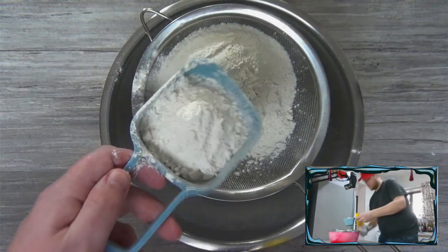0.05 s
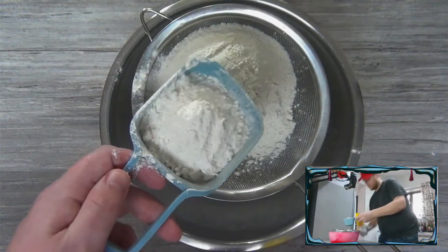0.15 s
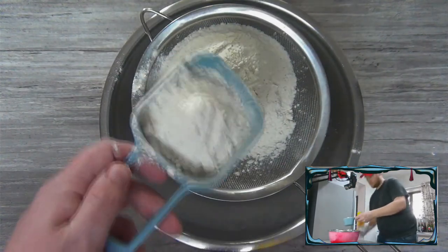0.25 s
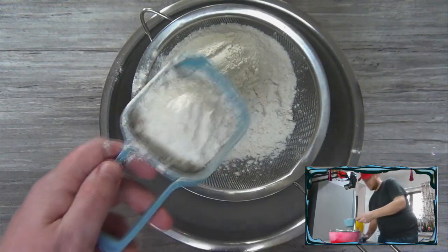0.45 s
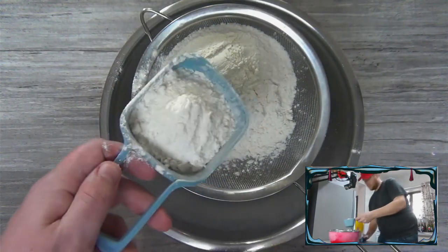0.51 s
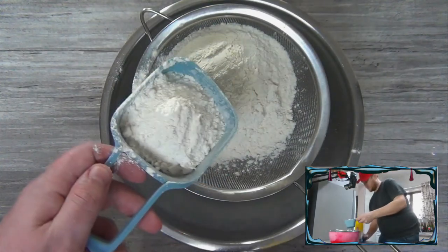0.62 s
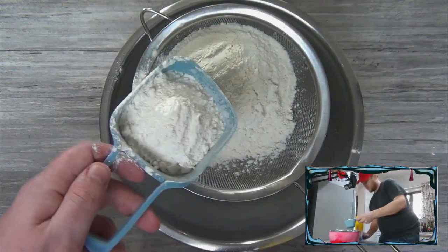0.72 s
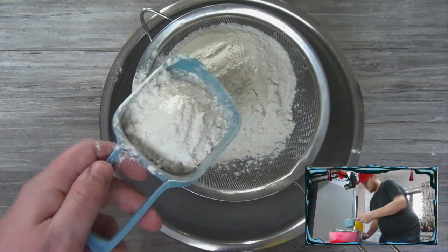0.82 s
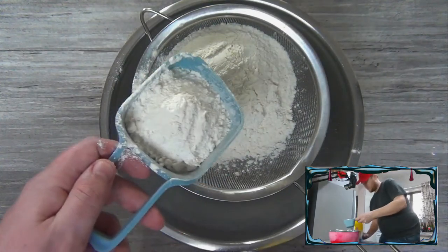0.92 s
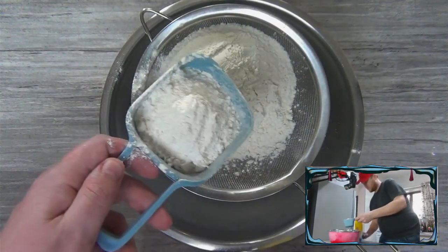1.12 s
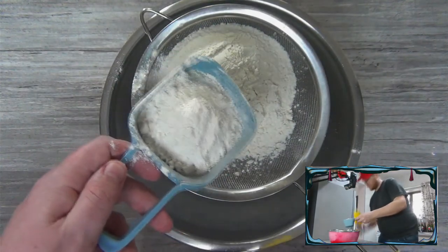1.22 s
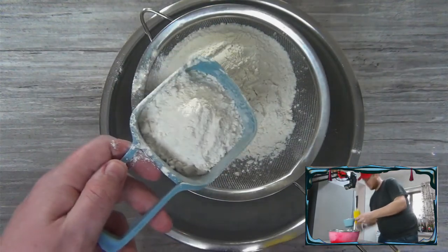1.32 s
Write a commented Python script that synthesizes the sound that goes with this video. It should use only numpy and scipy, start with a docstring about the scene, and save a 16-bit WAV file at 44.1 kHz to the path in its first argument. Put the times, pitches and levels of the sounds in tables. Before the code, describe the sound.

Short clatter of a plastic utensil put down on a counter, followed by lighter knocking.

```python
"""Small kitchen. A plastic utensil is put down on the worktop, rattles and settles; a tick, a second
clattering knock and a soft bump follow. Each contact gives a short noise clack and rings the utensil's
body and edge. Heavy contacts also thump the worktop; hard first touches add a thin snap.
Clacks, rings and thumps reverberate. Behind them: quiet room noise and a faint rustle of handling."""
import sys
import numpy as np
from scipy import signal
from scipy.fft import rfft, irfft, next_fast_len
from scipy.io import wavfile

SR = 44100
rng = np.random.default_rng(int(sys.argv[2]) if len(sys.argv) > 2 else 0)


def log_audio(samples):
    """Write samples as a 16-bit WAV file to the path given in sys.argv[1]."""
    # one column per channel
    frames = np.atleast_2d(samples).T
    # limit to full scale, then quantise
    limited = np.clip(frames, -1, 1)
    pcm = np.round(limited * 32767).astype(np.int16)
    wavfile.write(sys.argv[1], SR, pcm)


N = 59535

# Noise spectra. Each row: frequency in Hz, relative density in dB.
AIR_SPECTRUM = [(15, -46), (25, 9.5), (43, -11), (206, -7), (317, -6.5), (384, -8.5), (591, -9),
                (1020, -11), (1130, -14), (2550, -19.5), (6560, -31), (14400, -38.5), (16000, -44)]
RUSTLE_SPECTRUM = [(100, -29), (400, -4), (1200, 1.5), (2500, -4), (5000, -1), (8000, -10.5),
                   (12000, -13.5), (16000, -29)]
CLACK_SPECTRUM = [(60, -39), (150, -15.5), (280, 0.5), (460, -4.5), (680, -1.5), (950, -0.5), (1400, 2.5),
                  (1900, 0), (2400, -2.5), (3300, -2), (5000, -3), (7000, -12.5), (10000, -22),
                  (15000, -36.5)]
SNAP_SPECTRUM = [(500, -18), (4000, -1.5), (9000, 0.5), (15000, -9)]
# Reverb decay. Each row: frequency in Hz, T60 in seconds.
REVERB_DECAY = [(60, .5), (160, 0.5851), (420, 0.3043), (1100, 0.3859), (3000, 0.3641), (5000, 0.37),
                (8000, 0.3744), (14000, 0.35)]
# Reverb colour. Each row: frequency in Hz, gain in dB.
REVERB_COLOUR = [(60, -2), (130, -2.5), (300, 4), (1000, 2), (2000, -1.5), (5000, -4), (12000, -2.5)]
# Handling strokes. Each row: peak time in seconds, 1/e half width in seconds, level in dB.
RUSTLE_STROKES = [(1.12, 0.089, -68.5), (1.242, 0.02, -67.5)]
# Modes of the worktop, the utensil's bending body and its stiff, fast-damped edge.
# Each row: frequency in Hz, relative level in dB, T60 in seconds.
WORKTOP_MODES = [(66.7, 0, 0.089), (122.8, 4, 0.044), (178, -4, 0.064), (209, -5, 0.064), (269, -8, 0.061),
                 (315.5, -7.5, 0.066), (457, -8, 0.13), (528.5, -10, 0.084), (625, -5.5, 0.056),
                 (746, -19.5, 0.14)]
BODY_MODES = [(839, -7.5, 0.065), (990, -25, 0.026), (1171, -8.5, 0.14), (1315, -4, 0.051),
              (1410, 4, 0.027), (1603, 2, 0.053), (1935, -3, 0.025)]
EDGE_MODES = [(2700, -13, .008), (3330, -9, .008), (4230, -7, .009), (4750, -4, .009), (5400, -8, .007),
              (6900, -13, .006)]
# Blows reaching the worktop. Each row: start in seconds, gain in dB, push time in seconds,
# frequency favoured by the struck spot in Hz, falloff around it in dB per octave.
WORKTOP_BLOWS = [(0.2021, -20.5, 0.0021, 165.5, 8), (0.2463, -40, .001, 205, 4),
                 (0.2660, -29.5, 0.0018, 375, 16), (0.3038, -37, 0.003, 344, 7),
                 (0.3600, -35, 0.00088, 293, 17), (0.6277, -26.5, 0.00034, 101, 0),
                 (0.6340, -28.5, .001, 130, 4.5), (0.8234, -30.5, 0.00033, 110, 4),
                 (0.8290, -36, 0.0011, 119.5, 3)]
# Hard first touches. Each row: start in seconds, level in dB.
HARD_TOUCHES = [(0.199, -52), (0.6279, -43), (0.8239, -52.5)]
# Utensil contacts. Each row: start in seconds, gain in dB, clack rise in seconds, contact time in
# seconds, relative body ring in dB, frequency favoured by the struck spot in Hz, relative edge ring
# in dB, clack tilt in dB per octave, reverb send in dB.
UTENSIL_CONTACTS = [ (0.1852, -42.5, 0.0018, 0.011, -4, 1300, -13, -5.5, -5),
                    (0.1992, -40.5, 0.00048, 0.0082, -18, 1000, -16, -2, 3),
                    (0.2086, -24.5, 0.00051, 0.0038, -9, 1040, -21, 0.2, -2),
                    (0.2264, -44, 0.00083, 0.0031, -8, 1900, -10, -10, -4),
                    (0.2366, -34.5, 0.0011, 0.0018, 0, 1160, -10, -3, -10),
                    (0.2463, -28.5, 0.00088, 0.0029, -6, 945, 11.5, .5, -3),
                    (0.2801, -34.5, 0.00033, 0.0016, -23, 1140, -16, -7.5, -4.5),
                    (0.303, -32, 0.00072, 0.0019, -13, 1650, 7, 3.5, -8),
                    (0.3510, -39.5, 0.00067, 0.0069, -25, 850, -30, -7.5, -12.5),
                    (0.3610, -33.5, .001, 0.0038, -18, 1020, 4.5, 1.6, -4),
                    (0.5557, -44.5, 0.00015, .005, -2.5, 1610, -16, -2, -5.5),
                    (0.627, -32, 0.00048, 0.0062, 1, 1000, -26, -4.3, -3),
                    (0.6336, -27, 0.0019, 0.0086, -18, 1370, -26, -1.34, -5),
                    (0.6410, -34.5, 0.00049, 0.005, 9.5, 1490, -12, -3.5, -18.5),
                    (0.8240, -44, 0.00084, 0.0063, -6, 1000, -33, -0.9, -1)]

AIR_DB, HUM_DB, HUM_HZ, HUM_HALF_WIDTH_HZ = -63.5, -73.5, 197, 14
WALL_DELAY_S, REVERB_BUILD_S, THUMP_SEND_DB = 0.0033, 0.0025, -5
RING_RISE_S, RING_GAIN_DB, BODY_FOCUS_DB_PER_OCT = 0.00039, -1, 25.5
CLACK_T60_S, SNAP_T60_S = 0.019, 0.028
LOW_CUT_HZ, TOP_HZ = 45, 15800
HIT_SAMPLES = SR // 5


def amp(db):
    """Decibels to gain."""
    return 10 ** (np.asarray(db) / 20)


def unit_rms(x):
    """Scale to rms 1."""
    return x / np.sqrt(np.mean(x ** 2) + 1e-20)


def curve_at(points, hz):
    """Interpolate (Hz, value) points on a log frequency axis."""
    points_hz, values = np.transpose(points)
    return np.interp(np.log(hz + 1), np.log(points_hz + 1), values)


def filtered(x, response):
    """Zero-phase filter with gain response(hz)."""
    size = next_fast_len(len(x) + SR // 2)
    return irfft(rfft(x, size) * response(np.fft.rfftfreq(size, 1 / SR)), size)[:len(x)]


def noise(spectrum, tilt_db_per_oct=0, size=N):
    """Coloured noise of rms 1, tilted above about 200 Hz."""
    hz = np.fft.rfftfreq(size, 1 / SR)
    gain = amp(curve_at(spectrum, hz) + tilt_db_per_oct * np.log2(1 + hz / 200))
    return unit_rms(irfft(rfft(rng.standard_normal(size)) * gain, size))


def ring(modes, t, scatter_db, spot_hz=1, focus_db_per_oct=0):
    """Damped sines of alternating sign, favoured near spot_hz; levels scatter from blow to blow."""
    sound = np.zeros(len(t))
    for k, (hz, db, t60_s) in enumerate(modes):
        start_db = db + scatter_db * rng.standard_normal() - focus_db_per_oct * abs(np.log2(hz / spot_hz))
        sound += (-1) ** k * amp(start_db - 60 * t / t60_s) * np.sin(2 * np.pi * hz * t)
    return sound


def add(track, start_s, sound):
    """Mix a sound into the track in place."""
    part = track[round(start_s * SR):][:len(sound)]
    part += sound[:len(part)]


def room_noise():
    """Steady dull air noise plus a soft, narrow-band noise hum."""
    hum = filtered(rng.standard_normal(N), lambda hz: 1 / (1 + ((hz - HUM_HZ) / HUM_HALF_WIDTH_HZ) ** 2))
    return amp(AIR_DB) * noise(AIR_SPECTRUM) + amp(HUM_DB) * unit_rms(hum)


def room_tail():
    """Diffuse impulse response of the kitchen; each frequency decays at its own rate."""
    hz, frame_s, bins = signal.stft(rng.standard_normal(SR // 2), SR, nperseg=256)
    decay = amp(-60 * frame_s / curve_at(REVERB_DECAY, hz)[:, None])
    _, tail = signal.istft(bins * decay, SR, nperseg=256)
    t = np.arange(len(tail)) / SR
    tail *= np.clip((t - WALL_DELAY_S) / REVERB_BUILD_S, 0, 1)
    colour = amp(curve_at(REVERB_COLOUR, np.fft.rfftfreq(len(tail), 1 / SR)))
    return irfft(rfft(tail / np.linalg.norm(tail)) * colour)


def in_kitchen(radiate, send_db, paths=3):
    """One extra radiate() reaches the microphone directly; each of the `paths` radiate() calls, one per
    direction, fills the room."""
    reverb = sum(signal.fftconvolve(radiate(), room_tail()) for _ in range(paths))
    sound = amp(send_db) * reverb / np.sqrt(paths)
    add(sound, 0, radiate())
    return sound


def handling():
    """Faint rustles: noise in bell-shaped swells."""
    t = np.arange(N) / SR
    swells = sum(amp(db) * np.exp(-((t - peak_s) / half_s) ** 2) for peak_s, half_s, db in RUSTLE_STROKES)
    return noise(RUSTLE_SPECTRUM) * swells


def snaps():
    """The first touch of a hard blow: a tiny treble burst."""
    track, t = np.zeros(N), np.arange(HIT_SAMPLES) / SR
    for start_s, db in HARD_TOUCHES:
        add(track, start_s, amp(db - 60 * t / SNAP_T60_S) * noise(SNAP_SPECTRUM, size=HIT_SAMPLES))
    return track


def worktop():
    """Heavy contacts push the worktop; its modes give a short dull thump."""
    track, t = np.zeros(N), np.arange(HIT_SAMPLES) / SR
    for start_s, db, push_s, spot_hz, focus in WORKTOP_BLOWS:
        modes = ring(WORKTOP_MODES, t, scatter_db=0.91, spot_hz=spot_hz, focus_db_per_oct=focus)
        thump = -modes * (1 - np.exp(-t / push_s))
        add(track, start_s, amp(db) * in_kitchen(lambda: thump, THUMP_SEND_DB, paths=1))
    return track


def utensil():
    """Each contact: a fast-dying clack plus body and edge ring; the struck spot favours some modes."""
    track, t = np.zeros(N), np.arange(HIT_SAMPLES) / SR
    for start_s, db, rise_s, hold_s, body_db, spot_hz, edge_db, tilt, send_db in UTENSIL_CONTACTS:
        body = ring(BODY_MODES, t, scatter_db=0.77, spot_hz=spot_hz, focus_db_per_oct=BODY_FOCUS_DB_PER_OCT)
        edge = ring(EDGE_MODES, t, scatter_db=0.67)
        ringing = amp(body_db) * body + amp(edge_db) * edge
        ringing *= amp(RING_GAIN_DB) * (1 - np.exp(-t / RING_RISE_S))
        clack_decay = amp(-60 * np.maximum(t - hold_s, 0) / CLACK_T60_S)
        envelope = (1 - np.exp(-t / rise_s)) * clack_decay

        def radiate():
            """Same ring in each direction, fresh clack noise of equal energy."""
            clack = noise(CLACK_SPECTRUM, tilt, size=HIT_SAMPLES) * envelope
            return ringing + unit_rms(clack) * np.sqrt(np.mean(envelope ** 2))

        add(track, start_s, amp(db) * in_kitchen(radiate, send_db))
    return track


def scene():
    """Mono sum of all sources."""
    return (utensil() + worktop() + snaps() + handling() + room_noise())[None]


def record(dry):
    """Microphone: deep bass roll-off, hard upper band limit."""
    thinned = signal.sosfilt(signal.butter(2, LOW_CUT_HZ, "high", fs=SR, output="sos"), dry[0])
    return filtered(thinned, lambda hz: hz < TOP_HZ)[None]


dry = scene()
out = record(dry)
log_audio(out)
```